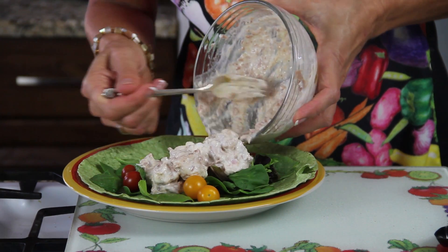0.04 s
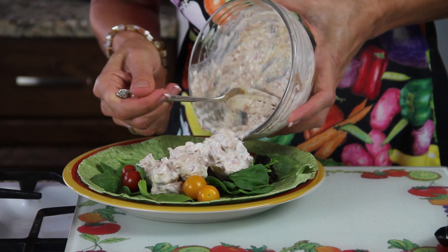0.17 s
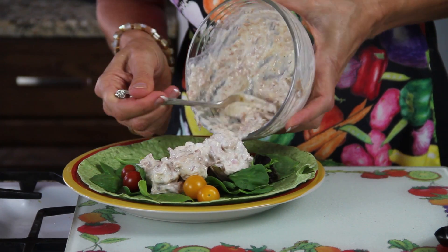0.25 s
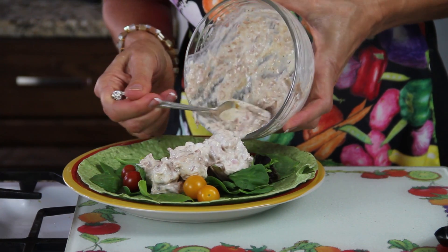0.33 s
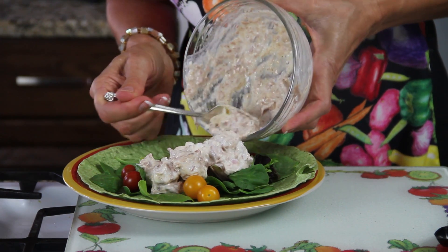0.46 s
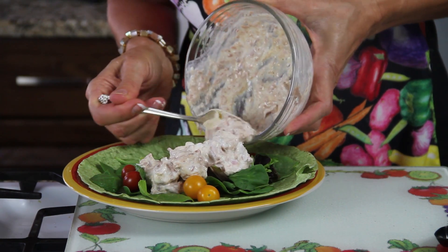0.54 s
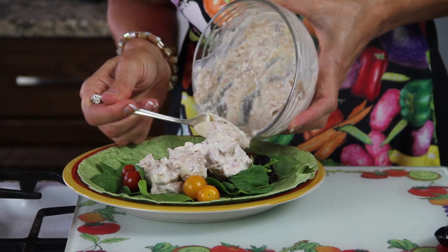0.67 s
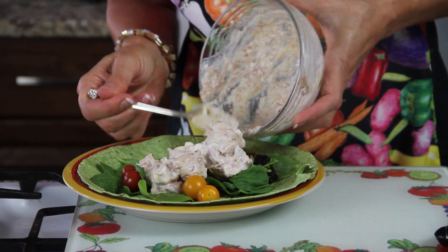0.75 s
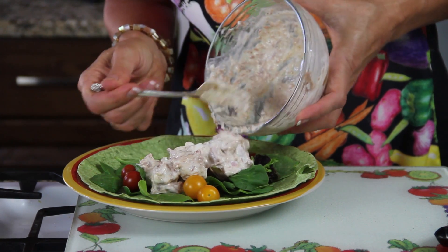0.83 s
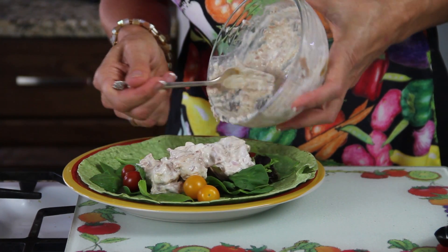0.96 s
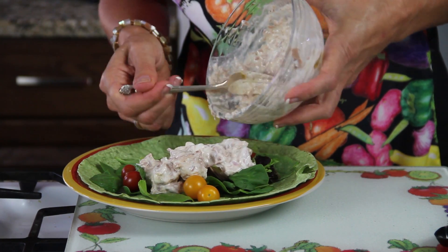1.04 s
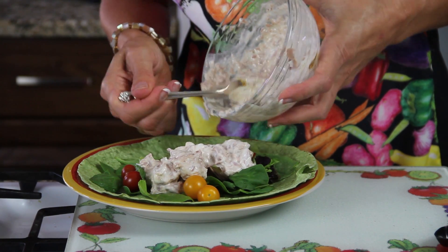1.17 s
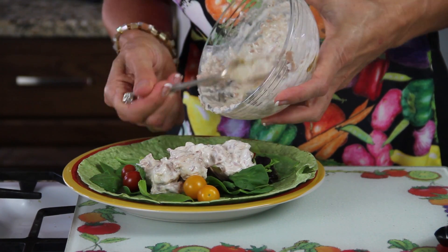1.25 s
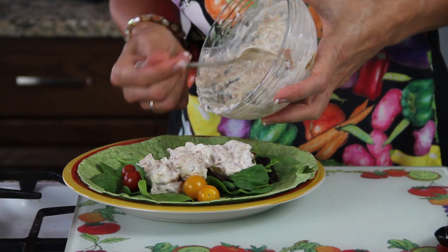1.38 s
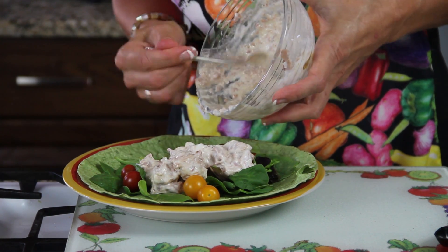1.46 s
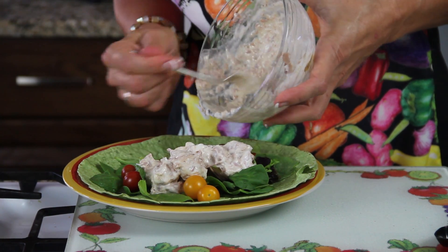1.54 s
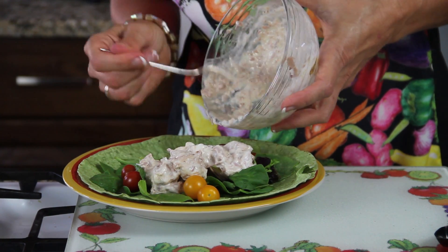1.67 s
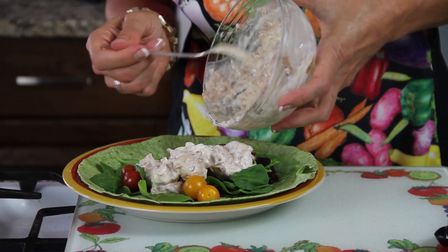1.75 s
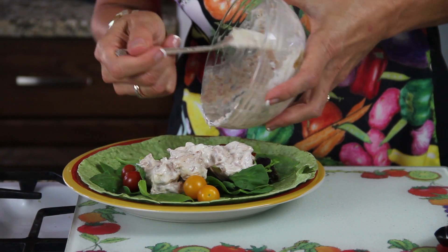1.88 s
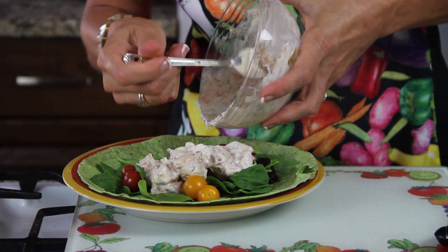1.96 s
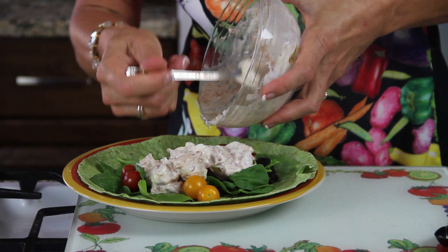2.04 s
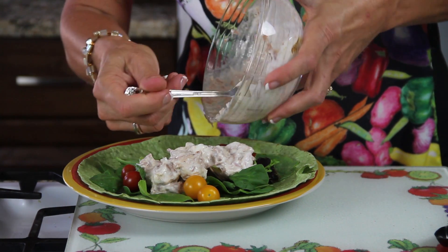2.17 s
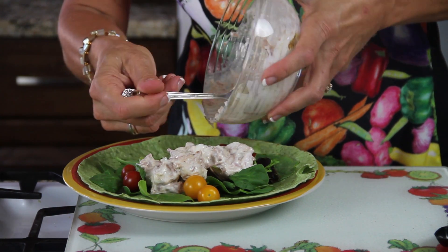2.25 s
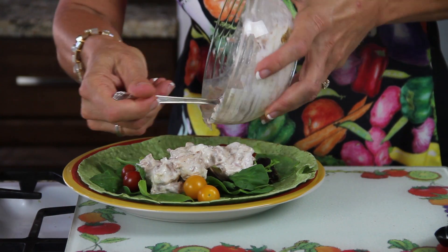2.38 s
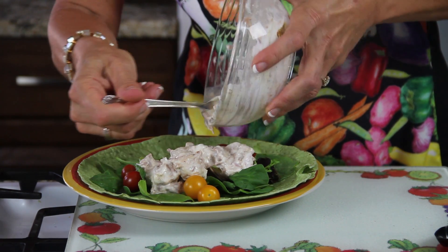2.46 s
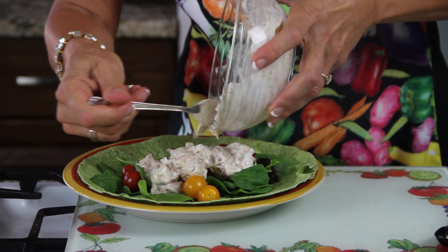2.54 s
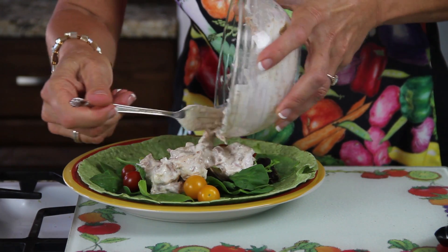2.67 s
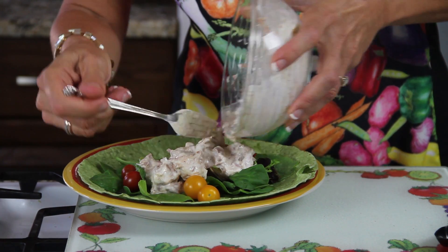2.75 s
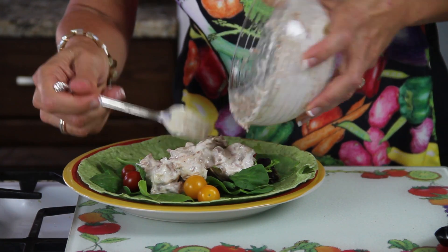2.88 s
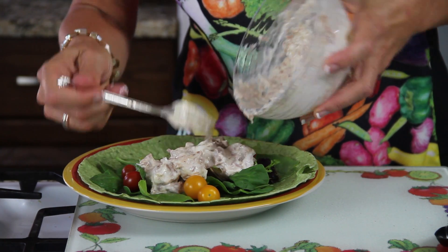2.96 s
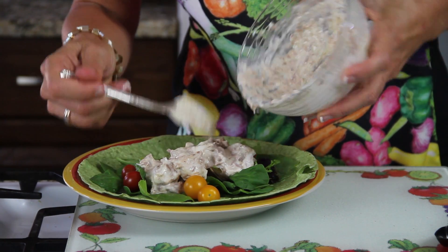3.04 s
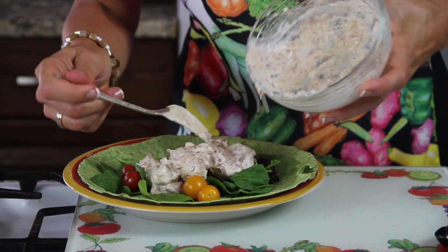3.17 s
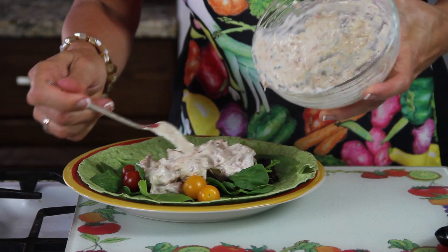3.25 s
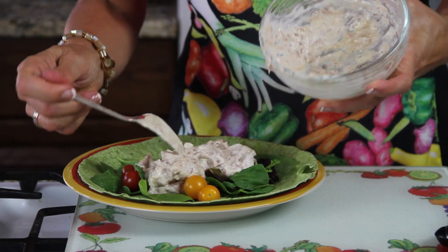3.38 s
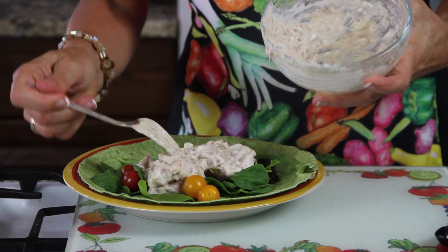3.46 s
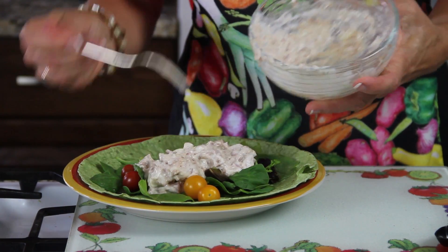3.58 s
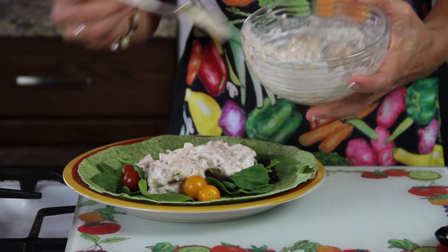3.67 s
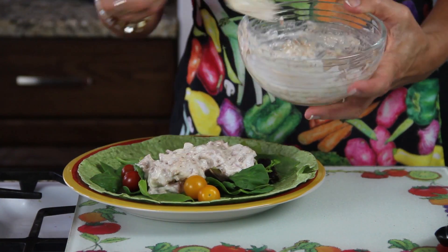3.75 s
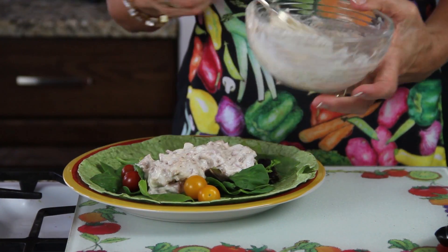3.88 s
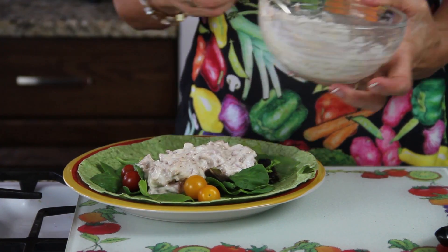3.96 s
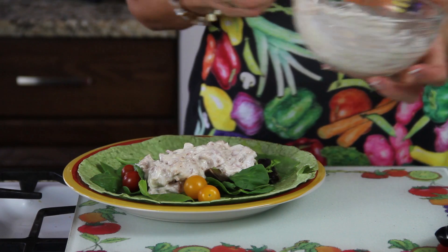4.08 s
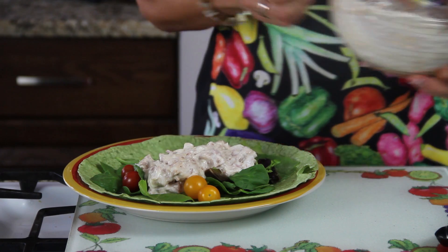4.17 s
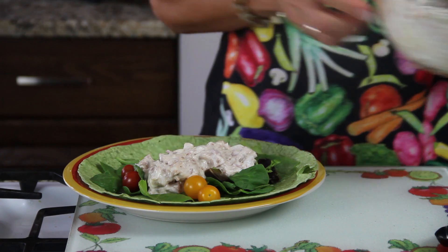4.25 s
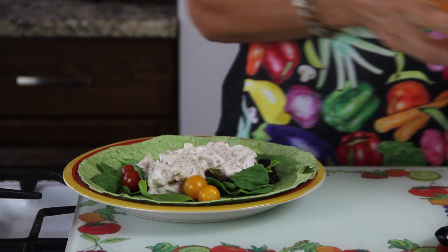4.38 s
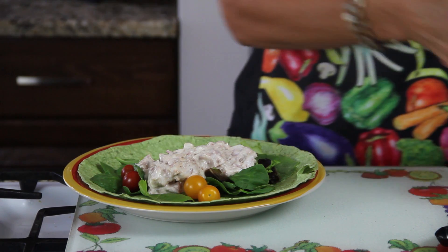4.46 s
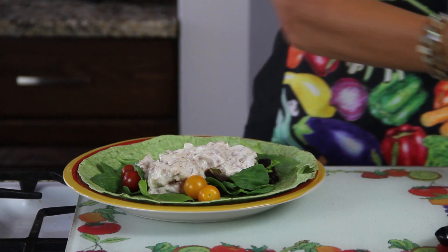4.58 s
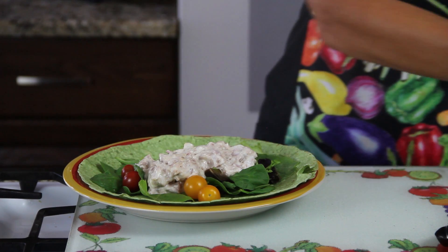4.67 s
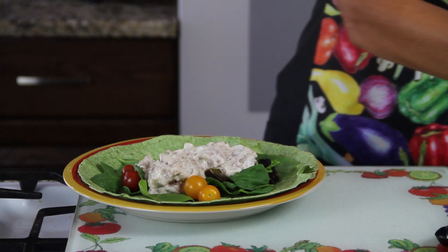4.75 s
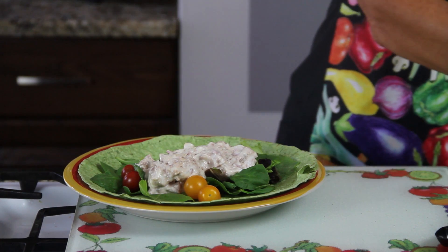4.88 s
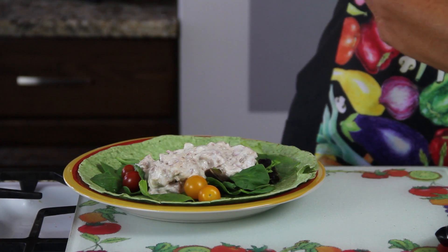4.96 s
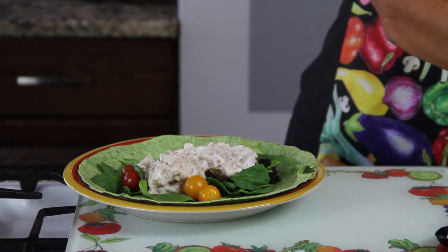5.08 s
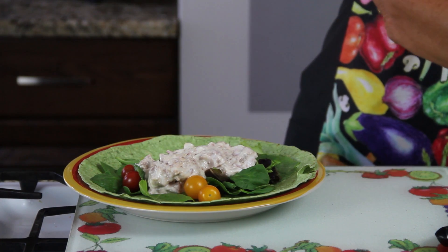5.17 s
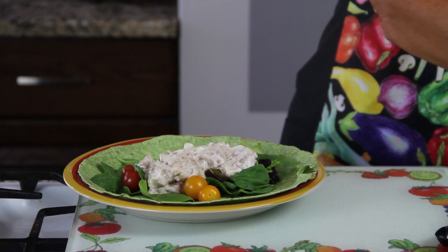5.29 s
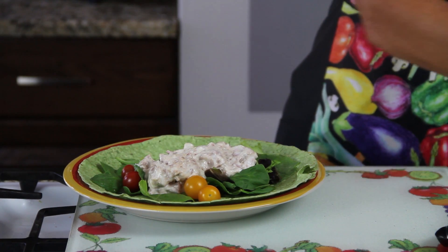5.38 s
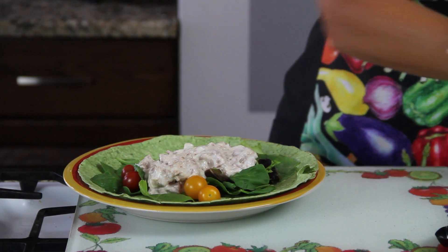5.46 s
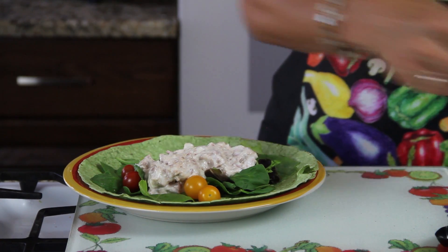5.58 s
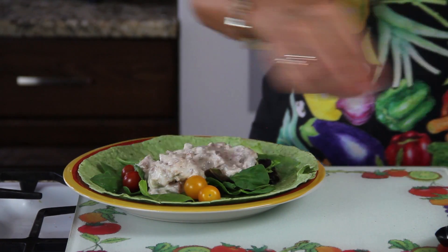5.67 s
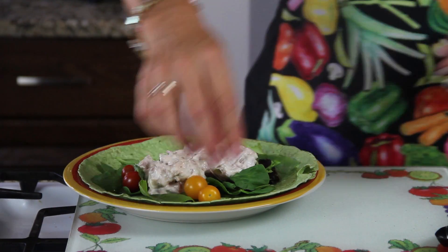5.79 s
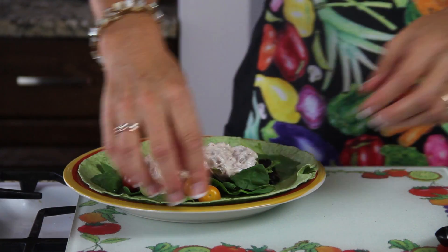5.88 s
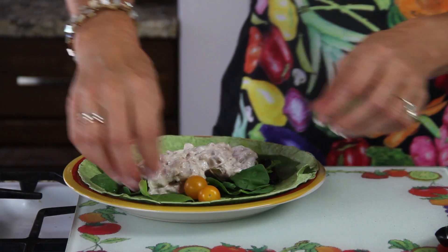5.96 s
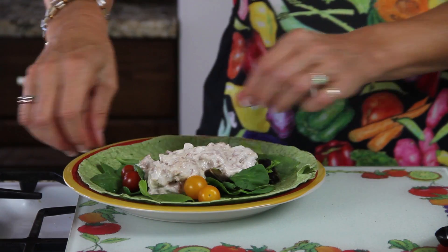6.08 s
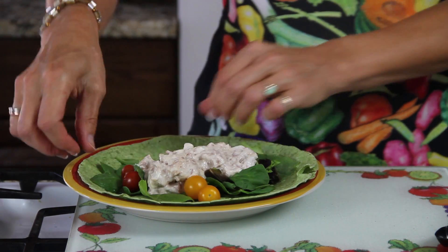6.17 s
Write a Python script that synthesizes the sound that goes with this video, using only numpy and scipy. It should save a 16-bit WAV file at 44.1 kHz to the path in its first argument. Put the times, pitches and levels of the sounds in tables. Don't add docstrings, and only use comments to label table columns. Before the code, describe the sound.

In a quiet home kitchen, a metal fork knocks and scrapes a hand-held glass bowl in short, bright bursts with gaps between. The fork is dropped into the bowl with a hard rattle, cloth rustles, then the bowl lands on a thin steel surface with a dense clang and rocks still. Louder fabric rubbing ends it. A close microphone worn on clothing hears a little room tail, low hum and hiss.

```python
import sys
import numpy as np
from scipy import signal
from scipy.fft import rfft, irfft, next_fast_len
from scipy.io import wavfile
from scipy.ndimage import uniform_filter1d, map_coordinates

SR = 44100
rng = np.random.default_rng(int(sys.argv[2]) if len(sys.argv) > 2 else 0)


def undo_db(level):
    steps = np.asarray(level, float) / 20
    return 10 ** steps


def master_out(mix):
    frames = np.transpose(np.atleast_2d(mix))
    ceiling = np.clip(frames, -1, 1)
    pcm = np.round(ceiling * 32767).astype(np.int16)
    wavfile.write(sys.argv[1], SR, pcm)


N = 274522
TAIL_S = 0.75
T = np.arange(3 * SR // 4) / SR


def unit(x):
    return x / np.sqrt(np.mean(x ** 2) + 1e-20)


def along(points, hz):
    f, v = np.transpose(points)
    return np.interp(np.log(hz + 1), np.log(f + 1), v)


def wobble(rate):
    knots = rng.standard_normal(int(N * rate / SR) + 4)
    return map_coordinates(knots, [np.arange(N) * rate / SR])


def coloured(x, spectrum):
    m = next_fast_len(len(x) + 8192)
    gain = undo_db(along(spectrum, np.fft.rfftfreq(m, 1 / SR)))
    return unit(irfft(rfft(x, m) * gain, m)[:len(x)])


def ring(hz, db, t60, attack=0.00086):
    hz, db, t60 = (np.asarray(v)[:, None] for v in (hz, db, t60))
    t = T[:int(t60.max() * SR)]
    modes = undo_db(db - 60 * t / t60) * np.sin(2 * np.pi * hz * t)
    return modes.sum(0) * (1 - np.exp(-t / attack))


def burst(db, t60, spectrum):
    t = T[:SR // 10]
    rise = np.sin(np.pi / 2 * np.clip(t / 0.00089, 0, 1)) ** 2
    return undo_db(db - 60 * t / t60) * rise * coloured(rng.standard_normal(len(t)), spectrum)


def dying(t60s, seconds):
    hz, t, z = signal.stft(rng.standard_normal(int(seconds * SR)), SR, nperseg=256)
    decay = undo_db(-60 * t / along(t60s, hz)[:, None])
    tail = signal.istft(z * decay, SR, nperseg=256)[1]
    return tail / np.linalg.norm(tail)


def struck(order, db, hardness, spot):
    node_db = 20 * np.log10(np.abs(np.cos(order * np.radians(spot))) + 0.08)
    return db + hardness * (order - 3) + node_db


def add(out, s, x):
    out[round(s * SR):][:len(x)] += x


# (frequency [Hz], level [dB per Hz])
HUM = [(12, -50), (20, -16), (76, -5), (170, -7.5), (194, -2.5), (240, -1), (264, -6), (309, -2),
       (340, -4.5), (561, -8.5), (1100, -20), (1190, -18), (2000, -25), (2600, -47), (4400, -120)]
HISS = [(20, -30), (500, -7), (2000, 0), (16000, -2)]


def floor():
    unsteady_db = 1.2 * wobble(3.25) + 1.23 * wobble(14)
    hum = unit(coloured(rng.standard_normal(N), HUM) * undo_db(unsteady_db))
    hiss = coloured(rng.standard_normal(N), HISS)
    return undo_db(-61.5) * hum + undo_db(-64) * hiss


# (frequency [Hz], decay t60 [s])
KITCHEN = [(200, 0.83), (1500, 0.48), (5000, 0.47), (12000, 0.2)]


def kitchen(x):
    out, step = np.zeros(N + 2 * SR), SR // 3
    for start in range(0, N, step):
        answer = signal.fftconvolve(x[start:start + step], dying(KITCHEN, TAIL_S))
        add(out, start / SR + 0.008, answer)
    return out[:N]


# (frequency [Hz], level [dB per Hz])
RUB = [(15, -53), (25, -29), (65, -2.5), (141, 3), (400, -7), (600, -21), (780, -18), (1320, -120)]
SWISH = [(180, -21), (300, -7), (712, -4.5), (1150, -8.5), (1380, -10.5), (1660, -13), (12000, -36),
         (15600, -78), (22000, -120)]
# (start [s], fastest [s], stop [s], drag level [dB], swish level [dB])
STROKES = [
    (3.93, 4.33, 4.9, -60, -83),
    (4.572, 4.854, 5.01, -52, -56.5),
    (5.703, 5.953, 5.95, -60, -67),
    (6.023, 6.107, 6.14, -43, -48.5),
    (6.187, 6.223, 6.7, -57.5, -64),
]


def cloth():
    drag = coloured(rng.standard_normal(N) * undo_db(1.3 * wobble(150)), RUB)
    lumps_db = 1.0 * wobble(200) + 0.89 * wobble(27.0)
    swish = coloured(rng.standard_normal(N) * undo_db(lumps_db), SWISH)
    swell_db, sag_db, edge_s = 11.5, 4.5, 0.056
    out, t = np.zeros(N), np.arange(N) / SR
    for start, fastest, stop, drag_db, swish_db in STROKES:
        times = [start - edge_s, start, fastest, stop, stop + edge_s]
        speed_db = np.interp(t, times, [-35, -swell_db, 0, -sag_db, -35], -150, -150)
        out += undo_db(drag_db + speed_db) * drag
        out += undo_db(swish_db + 1.3 * speed_db) * swish
    return out


# (time [s], level [dB], pitch [Hz])
THUDS = [(0.465, -50, 112), (0.558, -50, 71), (0.5587, -41, 340), (1.205, -42.5, 375), (1.589, -43, 330),
         (1.589, -62, 80), (2.103, -51, 81), (2.258, -67, 90), (4.106, -51, 70), (4.295, -49.5, 80),
         (4.355, -45.5, 149), (4.4, -38, 234), (5.203, -37.5, 72.5)]


def thuds():
    out = np.zeros(N + SR)
    for s, db, hz in THUDS:
        add(out, s, ring([hz], [db + 6.5], [5 / hz], attack=0.00018))
    return out[:N]


# (time [s], blow level [dB], thud level [dB], crack level [dB])
SETDOWN = [
    (5.206, -9.5, -35, -12),
    (5.212, -26, -16, -2.5),
    (5.233, -29, -36, -17),
    (5.431, -18, -46, -27),
    (5.444, -34.5, -49, -24),
    (5.494, -31.5, -30, -26),
]
# (frequency [Hz], level [dB])
STEEL = [(393.0, -55.5), (554.5, -57), (672.9, -52.5), (839.8, -49.5), (969.0, -49), (1066, -48),
         (1184, -63), (1249, -50), (1324, -56.5), (1717, -47), (1933, -57), (2191, -54), (2358, -58),
         (2471, -60)]
# (frequency [Hz], decay t60 [s])
STEEL_T60 = [(400, 0.44), (1000, 0.35), (2000, 0.23), (4000, 0.11)]
# (frequency [Hz], level [dB per Hz])
CLANG = [(150, -22), (400, -10.5), (1000, 0), (2400, -10), (3500, -21.5), (5000, -22.5), (8000, -39),
         (14000, -51)]
# (frequency [Hz], decay t60 [s])
CLANG_T60 = [(300, 0.41), (1000, 0.56), (3000, 0.51), (8000, 0.62)]
# (frequency [Hz], level [dB per Hz])
CRACK = [(200, -6), (650, -6), (1000, 6), (4000, -13), (8000, -28.5), (16000, -49)]


def setdown():
    out = np.zeros(N + SR)
    hz, db = np.transpose(STEEL)
    same = coloured(dying(CLANG_T60, TAIL_S), CLANG)[:len(T)]
    for s, blow_db, thud_db, crack_db in SETDOWN:
        shift = 1 + rng.normal(0, 0.003, len(hz))
        mode_db = blow_db - 19.5 + db - db.max() + rng.normal(0, 2.76, len(hz))
        add(out, s, ring(hz * shift, mode_db, along(STEEL_T60, hz), attack=0.0003))
        wash = 0.78 * same + 0.61 * coloured(dying(CLANG_T60, TAIL_S), CLANG)[:len(T)]
        rise = np.clip(T[:len(wash)] / 0.0006, 0, 1)
        add(out, s, undo_db(blow_db - 27.5) * wash * rise)
        add(out, s, ring([75, 140], [blow_db + thud_db - 1] * 2, [0.12, 0.08], attack=0.0013))
        add(out, s, burst(blow_db + crack_db + 18.5, 0.0043, CRACK))
    return out[:N]


# (time [s], level [dB])
SCRAPE = [
    [(0.47, -46), (0.476, -58), (0.488, -51.5), (0.535, -74)],
    [(0.568, -64), (0.616, -68), (0.655, -60)],
    [(2.104, -48), (2.112, -52), (2.148, -43.5), (2.16, -65)],
    [(4.11, -32), (4.126, -49), (4.18, -66)],
    [(4.237, -43), (4.243, -29), (4.279, -34.5), (4.297, -42), (4.325, -77)],
]


def scrape():
    slips = (rng.random(N) < 900 / SR) * rng.standard_normal(N) * undo_db(5 * wobble(150))
    t, pressure = np.arange(N) / SR, np.zeros(N)
    for skid in SCRAPE:
        s, db = np.transpose(skid)
        pressure += undo_db(np.interp(t, s, db, -150, -150))
    waves, db, t60 = np.transpose(GLASS)
    body = np.zeros(SR)
    add(body, 0, ring(*np.transpose(FORK + FORK_TIPS)[1:]))
    glass_hz = np.multiply(GLASS_HZ, GLASS_TUNING[-1][1])
    glass_db = db + 6.0 - 9 * (waves == waves.min())
    add(body, 0, ring(glass_hz, glass_db, t60 / 1.7))
    return signal.fftconvolve(unit(slips) * pressure, body / np.linalg.norm(body))[:N] * undo_db(-2.5)


# (part number, frequency [Hz], level [dB], decay t60 [s])
FORK = [(1, 790, -4, 0.014), (1, 930, -5.5, 0.023), (1, 988, -2.5, 0.062), (1, 1350, -1, 0.024),
        (2, 1870, -8.5, 0.029), (2, 2140, 5.5, 0.021), (2, 2330, -10, 0.031), (0, 2930, -4.5, 0.019),
        (0, 3080, -2, 0.023), (0, 3650, -12, 0.014), (0, 3880, -5.5, 0.034)]
# (part number, frequency [Hz], level [dB], decay t60 [s])
FORK_TIPS = [(3, 3700, -9.5, 0.032), (3, 4900, -6.5, 0.024), (3, 5350, -2.5, .014), (3, 5700, 0, 0.014),
             (3, 6200, -6, 0.02), (3, 7040, -13, 0.02), (4, 9200, -5.5, 0.023), (4, 9070, -3, 0.043),
             (4, 11000, -17, 0.013)]
PART_ORDER = [3, 1, 2, 4, 5]
PART_DB = [1.5, -2, -2.1, 2.6, -14.5]
# (time [s], level [dB], hardness [dB per order], spot [degrees])
SCOOP_CLACKS = [(0.4633, -35, -5, 76), (0.4784, -48, -1.1, 53.0), (0.5196, -44, -0.5, 23),
                (0.5581, -34, 0.5, 78.0), (0.6649, -47, -3.3, 73), (0.7008, -52, -4, 51),
                (0.7592, -50, 2, 50), (1.2042, -56, -2.6, 0.0), (1.3004, -64, -0.7, 22),
                (1.3374, -54.5, -4, 37.0), (1.5918, -47, -4, 40), (1.7499, -61, 3, 39),
                (1.7719, -60, -4, 2), (2.1036, -36.5, -1, 71.0), (2.1276, -33.5, 0, 62),
                (2.141, -34, 1, 62), (2.2568, -42, -6, 54), (2.5561, -59, -2, 60), (2.615, -44, -4.4, 53)]
# (time [s], level [dB], hardness [dB per order], spot [degrees])
DROP_CLACKS = [(4.1056, -19, 2, 79), (4.1154, -40, 7, 63.0), (4.152, -45, -3.5, 51), (4.2368, -29, 2.9, 74),
               (4.2464, -28, 4.5, 75), (4.2844, -33.7, -1, 70), (4.2931, -27, 5.5, 83),
               (4.3034, -32.5, 7, 70), (5.2325, -28.5, 2, 60), (5.2424, -29.5, 4.5, 57),
               (5.3544, -35, 0, 87), (5.4455, -29, -5.5, 40), (5.4534, -38, 3.5, 47)]
# (frequency [Hz], level [dB per Hz])
GRIT = [(700, -7), (1500, -1.5), (3000, 9.5), (5500, -11), (7500, -30), (12000, -39)]
# (frequency [Hz], level [dB per Hz])
SPRAY = [(6000, -30), (9000, 1), (12000, 0), (15500, -9)]
# (time [s], level [dB])
SLAPS = [
    (0.4636, -30.5),
    (4.1064, -23.5),
]
# (frequency [Hz], level [dB], decay t60 [s])
FLAT = [(965, -8, 0.029), (2143, 0, 0.027), (2240, -4, 0.022), (3080, -4.5, 0.02)]
# (frequency [Hz], level [dB], decay t60 [s])
HANDLE = [(712, 5, 0.032), (1036, 4.5, 0.044), (1270, 0.5, 0.028), (3650, -9.5, 0.067), (4670, -11, 0.044),
          (6030, -1, 0.025), (6430, -1, 0.039), (6430, -3, .035), (6480, -9, 0.03), (7100, -6, .025)]
# (frequency [Hz], level [dB per Hz])
ZING = [(3000, -40), (5700, -16), (6100, 1), (6500, 4), (7000, -10), (8000, -30)]


def fork():
    out = np.zeros(N + SR)
    part, hz, db, t60 = np.transpose(FORK + FORK_TIPS)
    clacks = list(SCOOP_CLACKS) + list(DROP_CLACKS)
    luck = rng.standard_normal((len(clacks), 2, len(hz)))
    for (s, *blow), (size, tune) in zip(clacks, luck):
        parts_db = struck(np.array(PART_ORDER), *blow) + PART_DB
        tines_db, *_, rim_db = parts_db
        shift = 1 + 0.014 * tune * (part < part.max())
        mode_db = parts_db[part.astype(int)] + db - 0.8 + 1.3 * size
        add(out, s + 0.0006, ring(hz * shift, mode_db, t60, attack=0.00096))
        add(out, s + 0.0006, burst(tines_db - 5.5, 0.0029, CRACK))
        add(out, s + 0.0006, burst(tines_db - 7.0, 0.054, GRIT))
        add(out, s + 0.0006, burst(rim_db - 18, 0.041, SPRAY))
    hz, db, t60 = np.transpose(FLAT)
    for s, slap_db in SLAPS:
        add(out, s, ring(hz, db + slap_db, t60, attack=0.00032))
    handle_s, handle_db = 1.5895, -42.5
    hz, db, t60 = np.transpose(HANDLE)
    add(out, handle_s, ring(hz, db + handle_db, t60, attack=0.00051))
    add(out, handle_s, burst(handle_db - 7, 0.13, ZING))
    return out[:N]


# (waves round the rim, level [dB], decay t60 [s])
GLASS = [(2, -5.5, 0.25), (2, -4, 0.26), (3, 1.5, 0.16), (3, -11.5, 0.11), (4, 2.5, 0.077), (4, -1, 0.11),
         (5, 2.5, 0.048), (5, -22, 0.023)]
GLASS_HZ = np.array([1087, 1063, 2526, 2490, 4360, 4392, 6540, 6460])
# (time [s], pitch ratio)
GLASS_TUNING = [(.7, .989), (.75, 1), (2.6, 1.001), (4.1, 1.007), (5.4, 1.004)]
# (time [s], level [dB], hardness [dB per order], spot [degrees], damping [x])
RINGS = [(0.6665, -41, -14, 45, 1.9), (0.7004, -47.5, -2, 71, 1.5), (0.7523, -38, -13, 45, 0.56),
         (0.7592, -50.5, 3.5, 82, 1.1), (1.3016, -55.5, -5.5, 67, 0.66), (1.3333, -55.5, -9, 73, .7),
         (1.7519, -46.5, -6.5, 31.5, 0.78), (1.774, -62.5, 4, 0, 0.93), (2.1548, -42.5, -8, 46.5, .7),
         (2.8073, -59, -9.5, 28, 1.7), (2.844, -59, -8, 27, 2.2), (2.904, -56.5, -8.5, 29, 1.6),
         (4.1509, -49.5, 3, 89, 0.43), (4.3127, -44, 1, 45, 0.94), (5.447, -43.5, 1.5, 47.5, 0.47)]
# (time [s], level [dB], hardness [dB per order], spot [degrees], damping [x])
KNOCKS = [(0.4629, -44, -0.5, 85.5, 3), (0.5595, -21, 0.5, 57, 2.97), (2.1022, -29, -4.5, 47.5, 1.1),
          (2.1138, -30, -2.5, 50, 2), (2.1264, -32, 1, 54, 2.9), (2.142, -33.5, 2.5, 53, 1.7),
          (2.2577, -46, -2, 3, 1.3), (2.617, -45.5, -2, 58, 1.75), (4.1076, -28.5, -3, 51, 4),
          (4.1161, -37.5, 9, 18, 1.9), (4.2363, -37, 3, 86, 2.6), (4.247, -42, -1, 90, 2),
          (4.2614, -38, 2.5, 79, 2.2), (4.2846, -35, 2, 55, 3.7), (4.2936, -19.5, -6.5, 46, 3.9),
          (4.3038, -28.5, 1.5, 62, 3.3), (5.2349, -32.5, 1, 0, 2.6), (5.2421, -26.5, 0, 25.5, 0.96)]


def bowl(choke_db):
    out, touches = np.zeros(N + SR), np.zeros(N + SR)
    waves, db, t60 = np.transpose(GLASS)
    above = waves - waves.min()
    taps = sorted(map(tuple, list(RINGS) + list(KNOCKS)))
    luck = rng.standard_normal((len(taps), len(db)))
    for s, *_, damping in taps:
        touches[round(s * SR)] = abs(choke_db) * damping ** 2
    stilled_db = np.cumsum(touches)
    for (s, *blow, damping), size in zip(taps, luck):
        tuning = np.interp(s, *np.transpose(GLASS_TUNING)) ** (above > 0)
        mode_db = struck(waves, *blow) + db + 0.4 * size
        held_t60 = t60 / max(damping, 0.3) ** np.clip(0.56 + 0.25 * above, 0, 1)
        x = ring(GLASS_HZ * tuning, mode_db, held_t60, attack=0.00025)
        since = stilled_db[round(s * SR):][:len(x)]
        add(out, s, x * undo_db(uniform_filter1d(since[0] - since, size=SR // 300)))
    return out[:N]


def scene():
    glass, steel = bowl(choke_db=2.2), setdown()
    clatter = fork() + scrape()
    room = kitchen(0.61 * glass + clatter + 0.79 * steel)
    mix = glass + clatter + steel + undo_db(-12.0) * room + thuds() + cloth() + floor()
    return mix[None]


def roll_off(x):
    return signal.sosfilt(signal.butter(12, 15840, fs=SR, output="sos"), x)


def record(dry):
    low_cut = signal.butter(2, 52, "highpass", fs=SR, output="sos")
    mix = signal.sosfilt(low_cut, dry)
    return roll_off(mix)


dry = scene()
out = record(dry)
master_out(out)
```